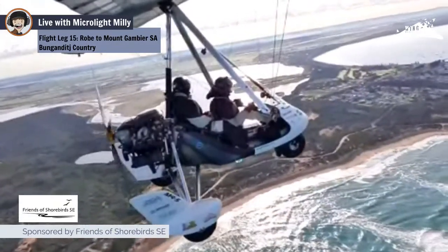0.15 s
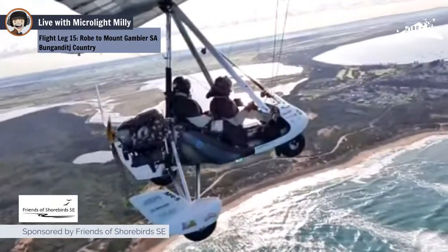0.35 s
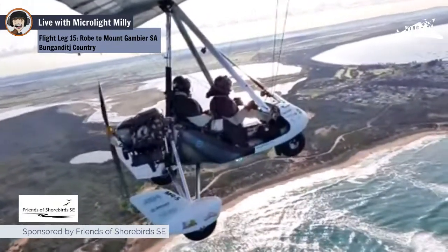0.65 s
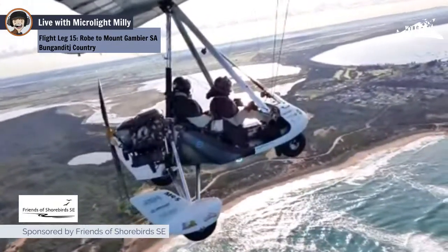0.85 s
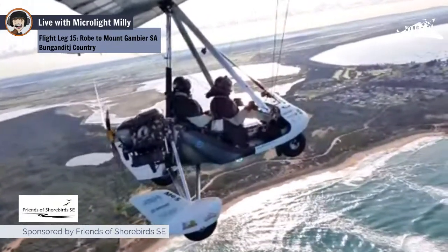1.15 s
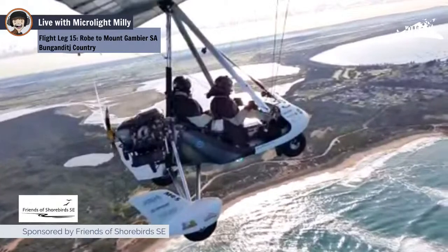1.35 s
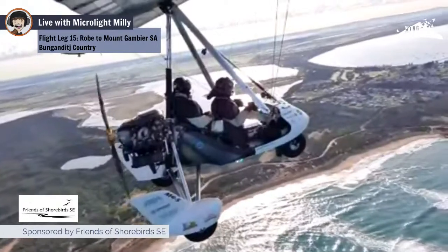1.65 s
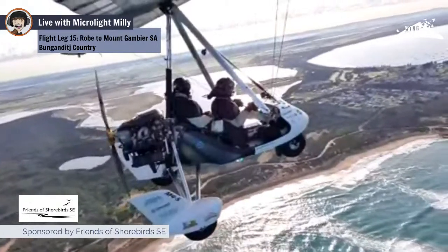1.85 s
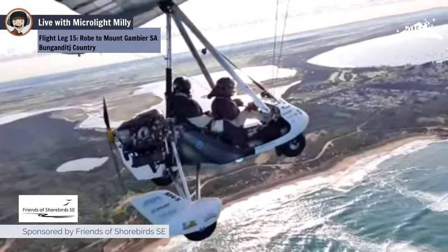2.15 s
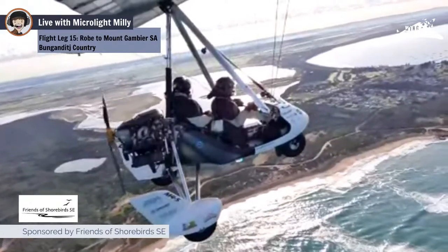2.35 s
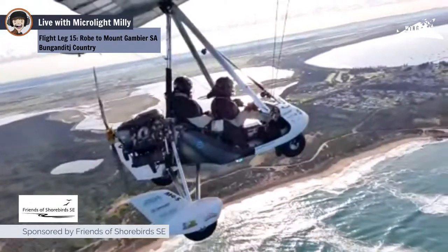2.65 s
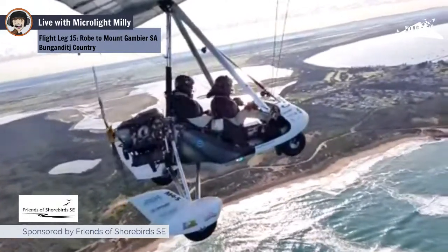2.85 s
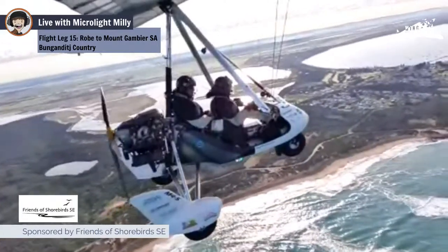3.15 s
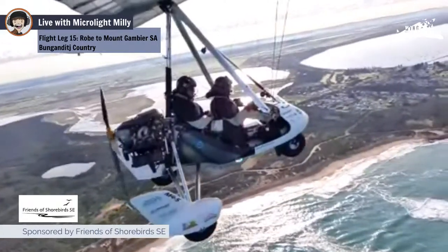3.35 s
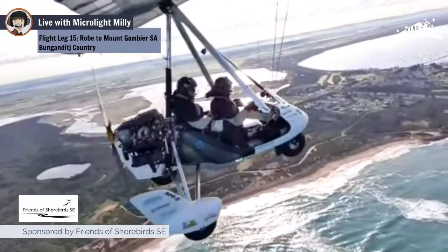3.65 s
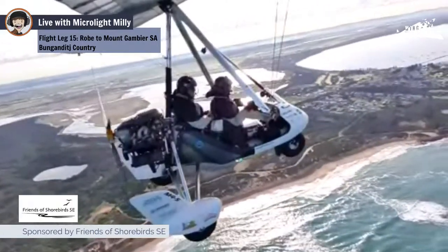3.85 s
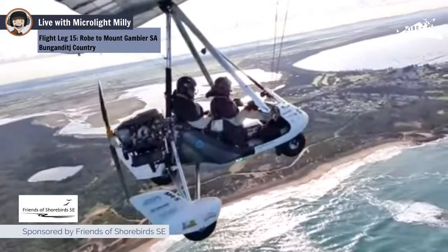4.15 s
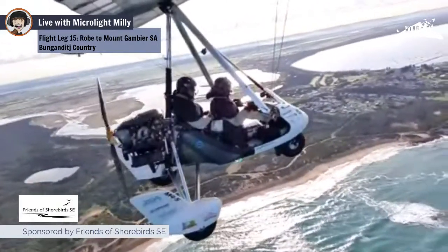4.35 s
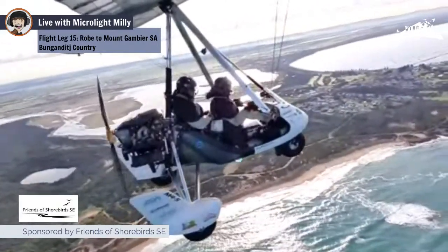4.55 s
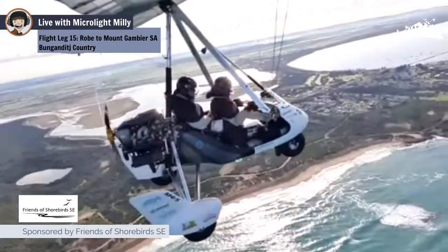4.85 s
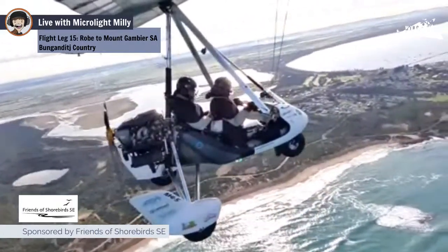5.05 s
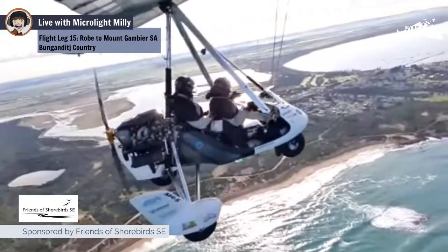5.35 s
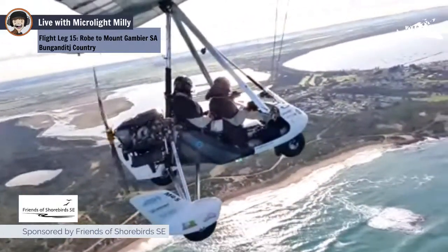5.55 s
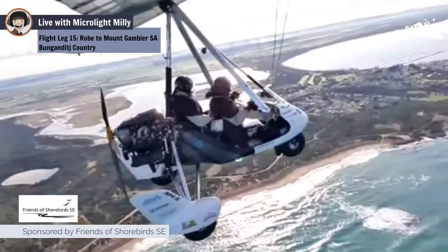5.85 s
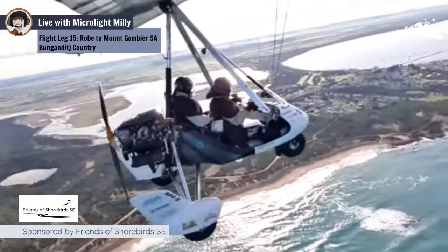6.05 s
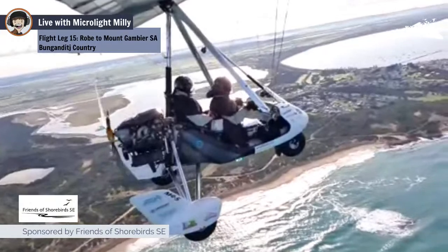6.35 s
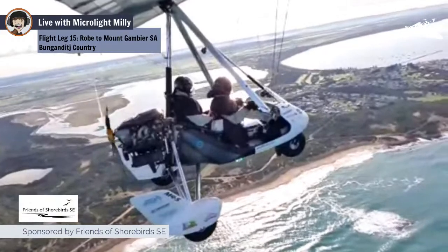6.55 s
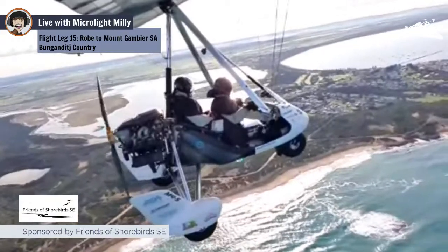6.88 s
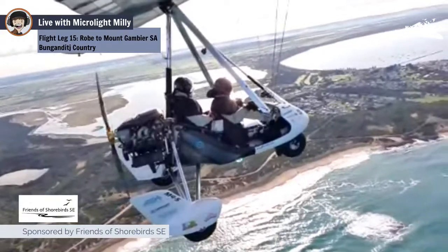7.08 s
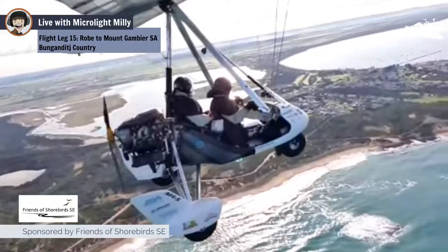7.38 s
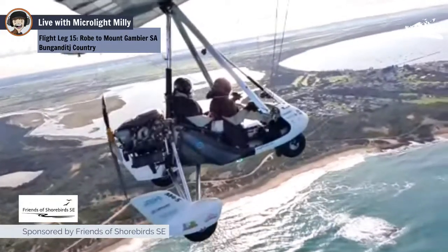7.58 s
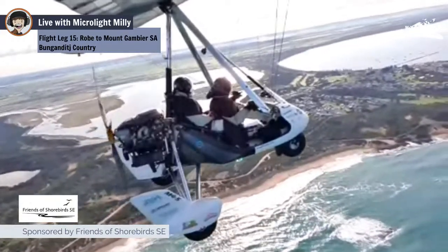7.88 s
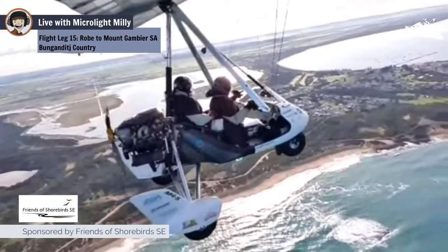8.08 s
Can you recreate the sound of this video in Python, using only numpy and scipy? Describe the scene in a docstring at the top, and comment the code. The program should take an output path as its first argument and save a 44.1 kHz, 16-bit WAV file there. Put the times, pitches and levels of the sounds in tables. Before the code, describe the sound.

A small open aircraft flies steadily, its engine, propeller and slipstream blurred into one rough, crackly, midrange roar over low rumble. After a second, sharp wind thumps hit the microphone with small metallic rattles. A long, very loud burst of distorted buffeting fills the middle, then shorter knocks follow and the roar continues to the end. The microphone is out on the wing, narrow and dull, without echo.

```python
"""A small open aircraft in steady flight, heard by a camera out on the wing.
From the start, engine, propeller and slipstream blur into a rough roar of noise and ticks that rings the frame
and camera housing, over low rumble and thin hiss of filtered noise. From 1.3 s loose parts rattle as short
buzzing rings, and gusts thump the microphone as noise swinging around a moving pitch. The gusts overload it
hardest around 4 s; the last ones come near 7.5 s, and the roar carries on to the end."""
import sys
import numpy as np
from scipy import signal
from scipy.fft import rfft, irfft
from scipy.io import wavfile
from scipy.ndimage import uniform_filter1d

SR = 44100
rng = np.random.default_rng(int(sys.argv[2]) if len(sys.argv) > 2 else 0)


def bounce(signal):
    """Save signal as a 16-bit WAV file at the path given by the first command-line argument."""
    frames = np.transpose(np.atleast_2d(signal))
    limited = np.clip(frames, -1, 1)
    pcm = np.round(limited * 32767).astype(np.int16)
    wavfile.write(sys.argv[1], SR, pcm)


N = 362502  # length [samples]

# Roar level through the flight, before the surges: (time [s], level [dB])
ROAR_LEVEL = [(0.0, -38), (0.5, -35), (1.1, -36.5), (1.7, -32), (2.1, -33.5), (2.75, -34.5), (3.399, -31.5),
              (3.9, -34.5), (4.3, -36.5), (4.69, -31), (5.0, -33.5), (5.6, -34.5), (5.9, -32.5), (6.3, -35),
              (7.4, -36), (7.62, -31), (7.9, -34.5), (8.22, -36)]
# Moments when the frame shudders and the roar surges in all bands: (time [s], lift [dB])
SURGES = [(0.369, 4.5), (.79, 4), (1.107, 7.5), (1.677, 7), (1.83, 3), (3.282, 7.5), (3.442, 4),
          (4.583, 7.5), (5.332, 2), (6.39, 1.5), (6.627, 7.5), (6.902, 5.5), (7.437, 5.5), (7.635, 2)]
# Broad slope of the roar under its resonances: (frequency [Hz], relative density [dB per Hz])
ROAR_SPECTRUM = [(180, -27.5), (300, 3.5), (418, 2), (509, -7.5), (853, -4.5), (948, -14.5), (1110, -14),
                 (1720, -12.5), (3110, -15.5), (3370, -12), (3700, -15.5), (4060, -19), (7070, -37),
                 (9190, -71), (15600, -120)]
# Resonances of frame and housing: (frequency [Hz], width [Hz], lift [dB])
RESONANCES = [(581.7, 38, 11), (800, 83, 4), (874, 54, 7), (1097, 170, 13.5), (1245, 77, 12.5),
              (2222, 40, 6.5), (2394, 30, 10), (2555, 210, 4), (3072, 86, 7.5), (3314, 36, 15.5),
              (3370, 70, 11), (3440, 19, 6.5), (3993, 77, 9), (4122, 130, 9), (4725, 41, 7.5),
              (5170, 360, 6)]
# Gusts on the microphone, before it overloads: (time of full strength [s], hold [s], level [dB],
# centre of the thump [Hz], pitch scatter [Hz], steadiness [share of a constant swing])
GUSTS = [(1.339, 0.011, -14.5, 202, 40, 1.8), (1.373, 0.044, -11, 173.9, 42.3, 0.72),
         (1.427, .006, -18, 192.3, 40, 1.6), (1.472, 0.034, -18.5, 184.7, 41.8, 0.92),
         (1.516, 0.034, -8.5, 212.2, 39.5, 0.92), (1.58, 0.0059, -11, 202, 40.2, 1.6),
         (1.625, 0.064, -22, 212.2, 40, 0.11), (3.197, 0.056, -27.5, 236.8, 60.6, 0.085),
         (3.681, 0.3, -5.5, 214.4, 62.3, 0.077), (3.998, 0.29, -2.5, 257.4, 77, 0.11),
         (4.324, 0.26, -9, 222.4, 57.7, 0.41), (4.65, 0.23, -9, 241.2, 57.4, 0.27),
         (4.962, 0.059, -17.5, 233.4, 48.7, 1.15), (5.16, 0.026, -20.5, 255.6, 60.6, 0.28),
         (5.302, 0.033, -30, 261.4, 60, 0.44), (5.712, 0.024, -21, 140.6, 30, 0.45),
         (5.727, 0.041, -9.5, 252.7, 28.8, 2.1), (5.793, 0.021, -13, 246, 30, 2),
         (5.842, 0.0089, -10.5, 271.3, 29.8, 2), (6.147, 0.013, -9, 249, 30.4, 1.6),
         (6.385, 0.011, -28.5, 242.3, 40, 1.5), (6.64, 0.027, -29.5, 171.3, 30, 2.5),
         (7.515, 0.013, -19.5, 147.6, 30, 1.4), (7.543, 0.015, -7.5, 266, 36, 1.6),
         (7.567, 0.0073, -10.5, 245, 36, 2)]
# Hardest swings within the gusts, before smoothing:
# (time [s], length [s], peak over full scale [dB], pitch [Hz])
SLAMS = [(1.53, 0.0098, 0.5, 221), (3.687, .011, -1, 184), (3.704, 0.0048, 1.5, 256), (3.766, .011, 2, 224),
         (3.806, 0.007, 2.5, 254), (3.84, .011, 1.5, 225), (3.867, 0.014, 1, 209.7), (3.916, .0053, 2, 205),
         (3.938, .018, 2, 236), (4.022, 0.0063, 0.2, 224.4), (4.032, .008, 2, 244.3),
         (4.048, .0043, 3, 245), (4.062, .011, 1.5, 245), (4.079, .006, 2.5, 279), (4.103, .004, 2, 264),
         (4.125, .019, 1.5, 214.3), (4.145, 0.011, 1.5, 245), (4.187, 0.0041, 0, 241),
         (4.23, 0.019, 1, 265.7), (4.25, 0.0074, 2.5, 281), (4.282, .0032, 1.5, 288),
         (4.337, 0.0088, -1, 212.4), (4.405, .012, 1.5, 230), (4.44, .016, 1.5, 213),
         (4.662, 0.0084, 1.5, 240), (4.804, .0049, 0, 224), (4.828, 0.0072, -.5, 272),
         (4.858, 0.021, 1, 281), (5.749, 0.017, -2.5, 257), (6.145, 0.016, 1.45, 229),
         (7.551, 0.018, -2.8, 268)]
# Broad rumble inside a gust: (frequency [Hz], relative density [dB per Hz])
BUFFET_SPECTRUM = [(60, -25.5), (110, 1.5), (180, 5), (380, -4), (450, -13), (620, -15), (900, -52),
                   (1600, -110)]
# Short ringing rattles: (time [s], level of the bare ring [dB], pitch [Hz], length [s])
RATTLES = [(1.332, -34.5, 3305, 0.071), (1.308, -34.5, 840, 0.075), (1.381, -32.5, 1067, 0.064),
           (1.385, -27, 558, 0.025), (1.449, -31.5, 598, 0.075), (1.521, -30.5, 618, 0.046),
           (1.613, -39.5, 4010, 0.069), (1.646, -42, 3570, 0.097), (1.689, -37, 3312, .13),
           (1.782, -34.5, 2386, 0.056), (2.868, -25.5, 582, 0.039), (3.017, -30.5, 3320, 0.058),
           (3.167, -31, 1230, 0.042), (3.259, -27.5, 1045, 0.045), (3.421, -26.5, 4720, 0.057),
           (3.43, -38, 4950, 0.058), (3.654, -25, 590, 0.054), (3.686, -18.5, 579, 0.049),
           (3.705, -34.5, 1146, 0.051), (3.74, -28, 750, 0.038), (3.771, -26.5, 593, 0.03),
           (3.993, -31.5, 1198, 0.039), (4.251, -35, 2396, 0.05), (4.288, -29, 606, 0.13),
           (4.88, -30, 596, 0.031), (5.285, -28, 588, 0.03), (4.531, -38, 3330, 0.059),
           (4.637, -28, 3280, 0.054), (5.319, -29.5, 3320, 0.025), (5.797, -29, 747, 0.025),
           (5.799, -26.5, 505, 0.053), (5.917, -32, 1085, 0.031), (6.192, -32.5, 3340, 0.066),
           (6.881, -33.5, 3330, 0.058), (7.531, -28.5, 1137, 0.024), (7.548, -27.5, 595, 0.053),
           (7.545, -27.5, 858, 0.046), (7.606, -28, 592, 0.054)]
# Slipstream rumble: (time [s], level [dB])
RUMBLE_LEVEL = [(0, -39), (.6, -36.5), (1.2, -35.5), (1.6, -33), (2.1, -37.5), (2.7, -37.5), (3.3, -36.5),
                (5.1, -29.5), (5.6, -35), (6.3, -33.5), (6.9, -39), (7.3, -37), (7.65, -35), (8.22, -36.5)]
# Colour of the slipstream rumble: (frequency [Hz], relative density [dB per Hz])
RUMBLE_SPECTRUM = [(18, -24.5), (30, -21.5), (54, -29.5), (62, -19.5), (79, -9), (156, -1.5), (257, 2.5),
                   (419, -14), (520, -13.5), (680, -46.5), (1140, -120)]
# Colour of the smooth air hiss: (frequency [Hz], relative density [dB per Hz])
HISS_SPECTRUM = [(3000, -35.5), (4300, -3.5), (5200, 0.7), (6000, -8.5), (6700, -28), (7050, -9),
                 (7500, -21)]

SURGE_S = 0.014  # time from the top of a surge until its lift in dB is down to 1/e
RISE_DB_PER_S, SAG_DB_PER_S = 798, 5.5  # a gust builds fast and sags a little while it holds
EXTRA_FALL_DB_PER_S = 752.5  # added to the sag after the hold, so it drops away
CLIMB_HZ_PER_S, WANDER_HZ = 40, 11  # the pitch of a gust creeps up and wanders
THUMP_TOP_HZ = 476  # upper edge of the thump
BUFFET_DB = -10  # broad rumble, against the gust level
PUSH_HZ, PUSH_DB = 45, -19.5  # slow pressure push: upper edge, and level against the gust
RING_WAVER_HZ = 9  # how far the pitch of a rattle strays
HISS_DB, NOISE_DB = -56.5, -93.5  # air hiss; recorder self-noise before the last low-pass
MIC_EDGE_HZ, RECORDER_EDGE_HZ = 7350, 15800
CAPSULE_MAX, RECORDER_MAX = 0.94, 0.95  # largest membrane swing; recorder clipping level


def gain_of(db):
    """Turns dB into an amplitude factor."""
    return 10 ** (np.asarray(db) / 20)


def evened(x):
    """Scales a signal to rms 1."""
    return x / np.sqrt(np.mean(np.abs(x) ** 2) + 1e-20)


def read(points, hz):
    """Reads a spectrum table between its points, along a log frequency scale."""
    f, value = np.transpose(points)
    return np.interp(np.log(hz + 1), np.log(f + 1), value)


def add(mix, s, sound):
    """Lays a sound into the mix from time s."""
    part = mix[round(s * SR):][:len(sound)]
    part += sound[:len(part)]


def butter(x, order, hz, kind="low"):
    """Filters x with a Butterworth slope."""
    return signal.sosfilt(signal.butter(order, hz, kind, fs=SR, output="sos"), x)


def butter_both_ways(x, order, hz):
    """Low-passes x forwards and backwards, so nothing is delayed."""
    return signal.sosfiltfilt(signal.butter(order, hz, fs=SR, output="sos"), x)


def low_pass(x, hz):
    """Cuts steeply above hz without delay."""
    taps = signal.firwin(511, hz, window=("kaiser", 9), fs=SR)
    return signal.oaconvolve(x, taps[None], "same")


def drift(shape, *sizes):
    """Smooth chance of rms 1, averaged twice over sizes[k] cells along axis k."""
    x = rng.standard_normal(shape)
    for k, size in enumerate(sizes):
        x = uniform_filter1d(uniform_filter1d(x, size, k), size, k)
    return evened(x)


def coloured(x, db_of):
    """Applies a gain in dB that is a function of frequency."""
    hz = np.fft.rfftfreq(len(x), 1 / SR)
    return irfft(rfft(x) * gain_of(db_of(hz)), len(x))


def patchy(x, patch_db, flicker_db):
    """Turbulence: patches some hundred Hz wide come and go, and all bands flutter together."""
    z = signal.stft(x, nperseg=512, noverlap=384)[2]
    patches = patch_db * drift(z.T.shape, 10, 3).T  # smoothed along time, then frequency
    flicker = flicker_db * drift(z.shape[1], 5)
    return signal.istft(z * gain_of(patches + flicker), nperseg=512, noverlap=384)[1][:N]


def body(hz):
    """Frame and housing: the broad slope of the roar with each resonance lifted out of it, in dB."""
    lift = 0
    for centre, width, db in RESONANCES:
        lift = lift + (gain_of(db) ** 2 - 1) / (1 + (2 * (hz - centre) / width) ** 2) ** 2
    return read(ROAR_SPECTRUM, hz) + 10 * np.log10(np.maximum(1 + lift, 1e-3))


def roar():
    """Hiss and a hail of uneven ticks shake the frame and the housing."""
    sizes = gain_of(5.8 * np.minimum(rng.exponential(1, N), 4.2))  # a few ticks stand far out
    signs = rng.choice([-1., 1.], N)
    ticks = evened(sizes * signs * (rng.random(N) < 900 / SR))  # about 900 ticks per second
    shaking = patchy(rng.standard_normal(N) + .5 * ticks, patch_db=2.5, flicker_db=2.0)
    t = np.arange(N) / SR
    level_db = np.interp(t, *np.transpose(ROAR_LEVEL))
    surge_db = sum(db * np.exp(-((t - at) / SURGE_S) ** 2) for at, db in SURGES)
    return gain_of(level_db + surge_db) * evened(coloured(shaking, body))


def membrane_swing(count, spread_hz, steady):
    """Slow complex noise: the strength and phase of a thump, swelling in lumps of a few cycles."""
    settle = 4000  # samples dropped while the filter settles
    noise = rng.standard_normal(count + settle) + 1j * rng.standard_normal(count + settle)
    swing = evened(butter(noise, 2, spread_hz)) + steady
    swing = swing / (0.18 + abs(swing)) ** 0.38  # more even than plain chance
    return evened(swing)[settle:]


def slammed(swing, pitch, t, s, hold):
    """Slams take over swing and pitch for a moment, and the buffeting gives way to them."""
    loose = np.ones(len(t))
    for at, length, peak_db, slam_hz in SLAMS:
        if -.01 < at - s < hold:
            slam = np.exp(-(2.08 * (s + t - at) / length) ** 4)  # flat-topped bump
            middle = swing[np.searchsorted(t, at - s)]
            swing = (1 - slam) * swing + slam * gain_of(peak_db) * middle / abs(middle)  # keeps the phase
            pitch = pitch + slam * (slam_hz - pitch)
            loose *= 1 - 0.47 * slam
    return swing, pitch, loose


def gust(s, hold, level_db, hz, spread_hz, steady):
    """Eddies swing the membrane around a moving pitch, with broad buffeting and a slow push of pressure."""
    t = np.arange(-.08, hold + .08, 1 / SR)  # 0 at full strength
    rise_and_sag_db = np.minimum(RISE_DB_PER_S * t, -SAG_DB_PER_S * t)
    fall_db = EXTRA_FALL_DB_PER_S * np.maximum(t - hold, 0)
    envelope = gain_of(level_db + rise_and_sag_db - fall_db)

    pitch = hz + CLIMB_HZ_PER_S * t + WANDER_HZ * drift(len(t), SR // 30)
    swing = membrane_swing(len(t), spread_hz, steady) * envelope * np.sqrt(2)
    swing *= np.minimum(0.71 / abs(swing), 1)  # ordinary swings stay below the slams
    swing, pitch, loose = slammed(swing, pitch, t, s, hold)
    swing = butter_both_ways(swing, 1, 190.)

    turn = np.exp(2j * np.pi * np.cumsum(pitch) / SR)
    thump = butter((swing * turn).real, 2, 105., "high")
    thump = butter_both_ways(thump, 4, THUMP_TOP_HZ)
    buffet = evened(coloured(rng.standard_normal(len(t)), lambda f: read(BUFFET_SPECTRUM, f)))
    push = evened(butter(rng.standard_normal(len(t)), 3, PUSH_HZ))
    under = gain_of(BUFFET_DB) * loose * buffet + gain_of(PUSH_DB) * push
    return s + t[0], thump + envelope * under


def rattle(s, level_db, hz, length):
    """One loose part rings at its unsteady pitch while the whole frame buzzes along."""
    count = round(np.clip(length, .01, .18) * SR)
    pitch = hz + RING_WAVER_HZ * drift(count, 300)
    tremble = 1 + .35 * drift(count, 50)
    ring = np.sin(2 * np.pi * np.cumsum(pitch) / SR) * tremble
    buzz = evened(coloured(rng.standard_normal(8192), body))[:count]
    fade = signal.windows.tukey(count, .7)  # soft start and end
    return s, gain_of(level_db) * (ring + .4 * buzz) * fade


def rumble():
    """Low, lumpy slipstream over the microphone port."""
    eddies = patchy(rng.standard_normal(N), patch_db=1.5, flicker_db=2.5)
    low = evened(coloured(eddies, lambda hz: read(RUMBLE_SPECTRUM, hz)))
    level_db = np.interp(np.arange(N) / SR, *np.transpose(RUMBLE_LEVEL))
    return gain_of(level_db) * low


def hiss():
    """Air over wing and wires: high noise with a steadier overall level than the roar, in patches."""
    air = patchy(rng.standard_normal(N), patch_db=4.5, flicker_db=0.5)
    return gain_of(HISS_DB) * evened(coloured(air, lambda hz: read(HISS_SPECTRUM, hz)))


def scene():
    """Lays the gusts and rattles over the steady roar, rumble and hiss, in one channel."""
    mix = roar() + rumble() + hiss()
    for row in GUSTS:
        add(mix, *gust(*row))
    for row in RATTLES:
        add(mix, *rattle(*row))
    return mix[None]


def record(dry):
    """The narrow, bass-shy microphone overloads, a bass cut slants the flat tops, and the recorder clips."""
    narrow = butter(low_pass(dry, MIC_EDGE_HZ), 2, 85., "high")
    flat_topped = np.clip(narrow, -CAPSULE_MAX, CAPSULE_MAX)
    slanted = butter(flat_topped, 1, 35., "high")
    clipped = np.clip(slanted, -RECORDER_MAX, RECORDER_MAX)
    self_noise = gain_of(NOISE_DB) * rng.standard_normal(dry.shape)
    return low_pass(clipped + self_noise, RECORDER_EDGE_HZ)


dry = scene()
out = record(dry)
bounce(out)
```